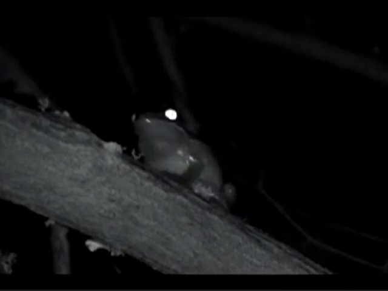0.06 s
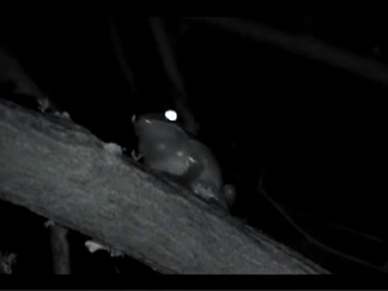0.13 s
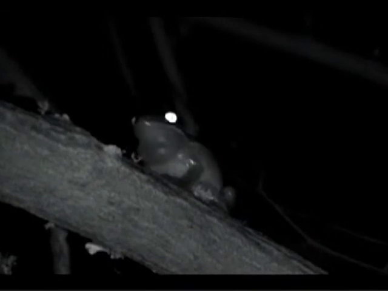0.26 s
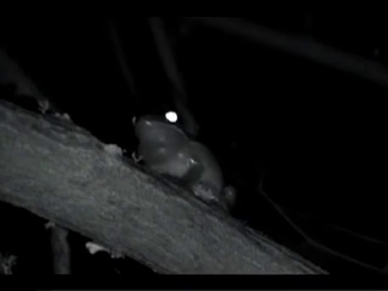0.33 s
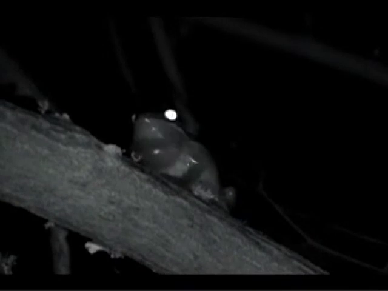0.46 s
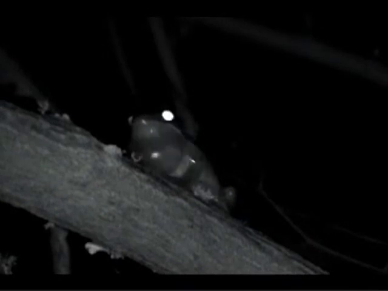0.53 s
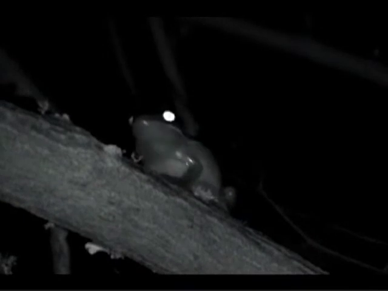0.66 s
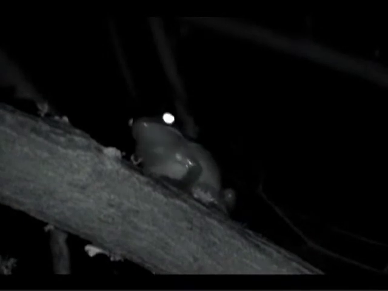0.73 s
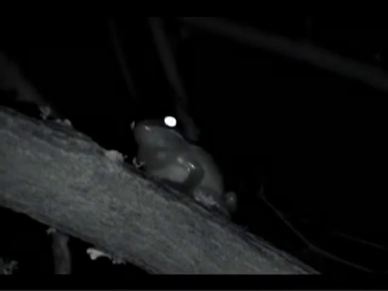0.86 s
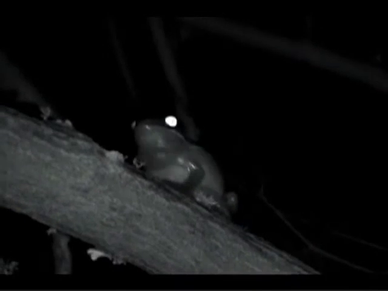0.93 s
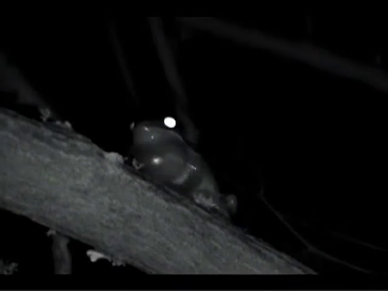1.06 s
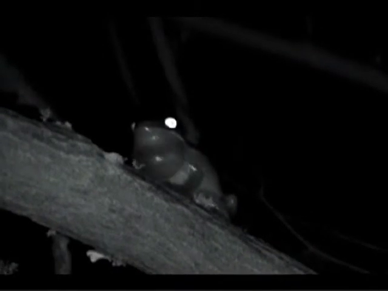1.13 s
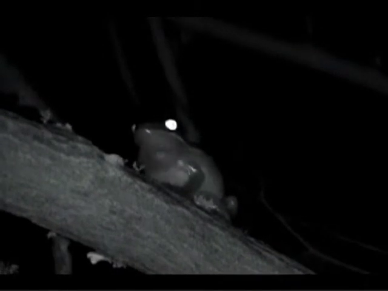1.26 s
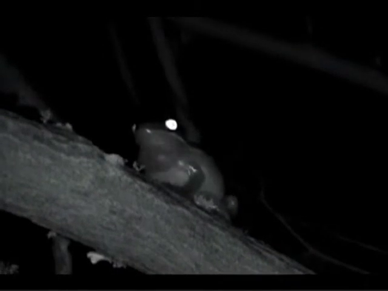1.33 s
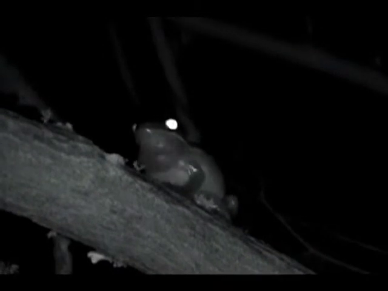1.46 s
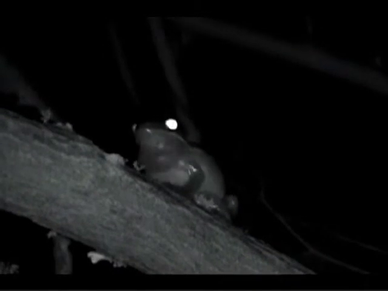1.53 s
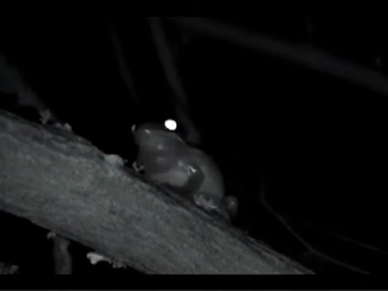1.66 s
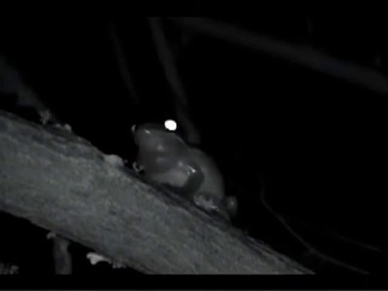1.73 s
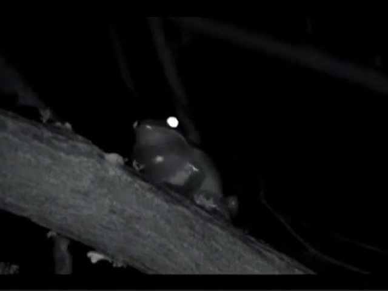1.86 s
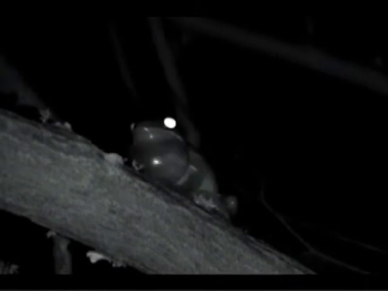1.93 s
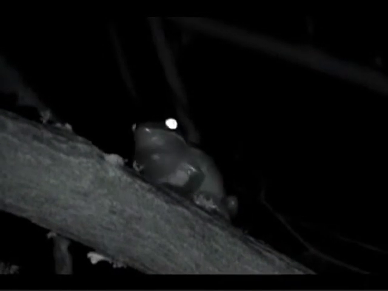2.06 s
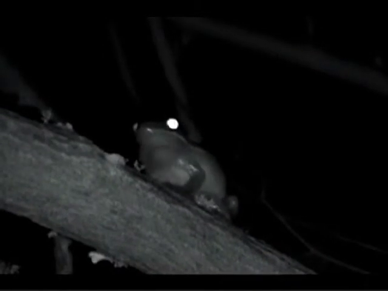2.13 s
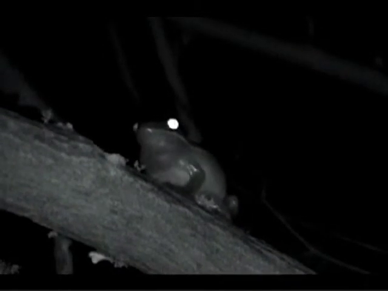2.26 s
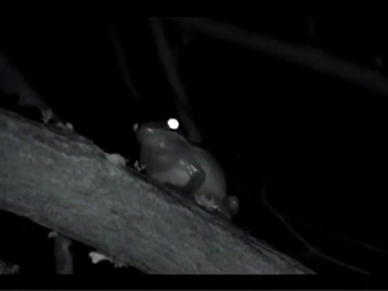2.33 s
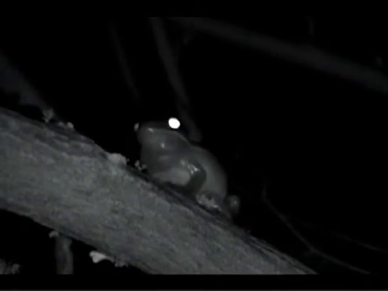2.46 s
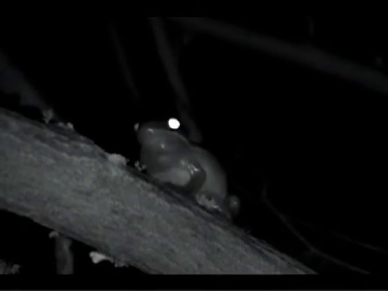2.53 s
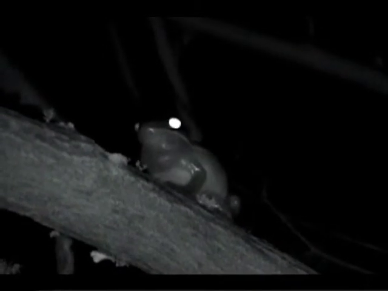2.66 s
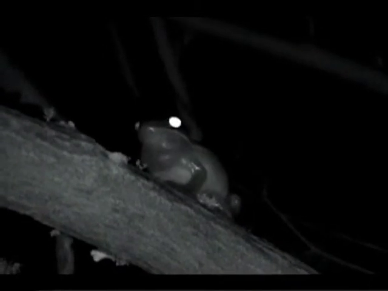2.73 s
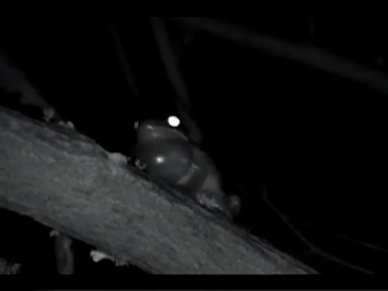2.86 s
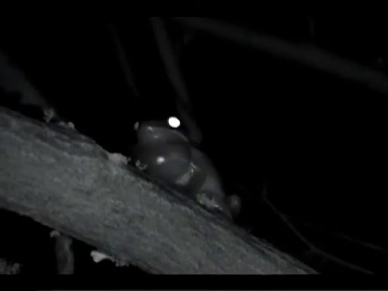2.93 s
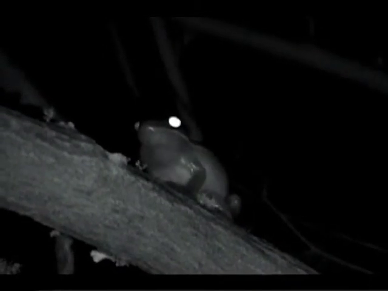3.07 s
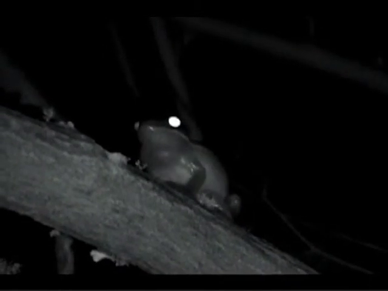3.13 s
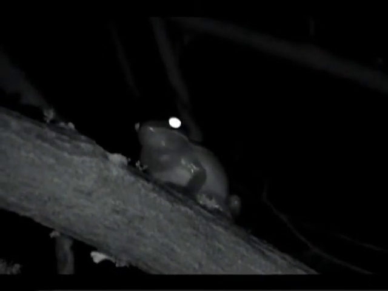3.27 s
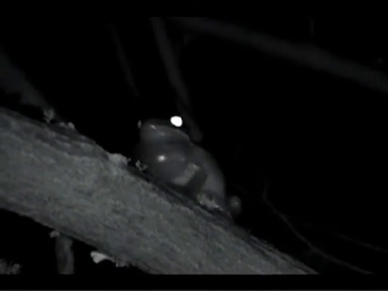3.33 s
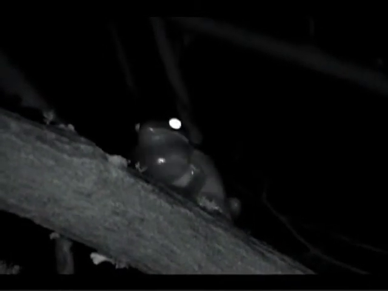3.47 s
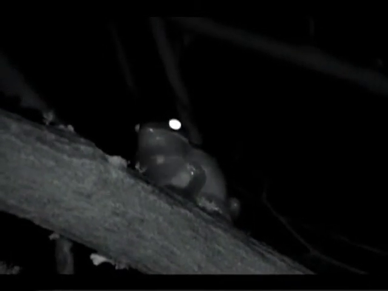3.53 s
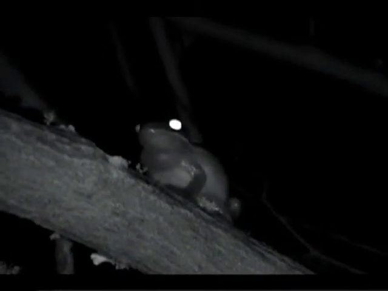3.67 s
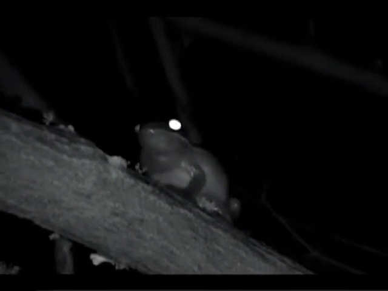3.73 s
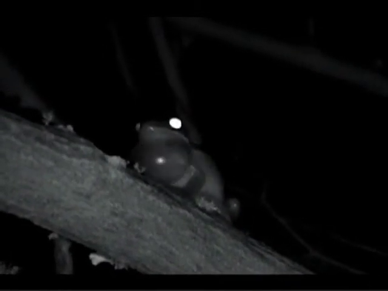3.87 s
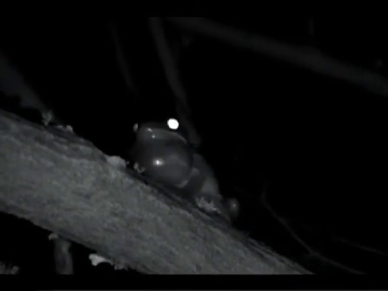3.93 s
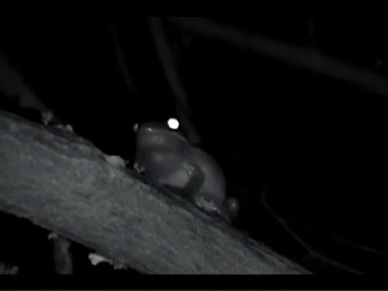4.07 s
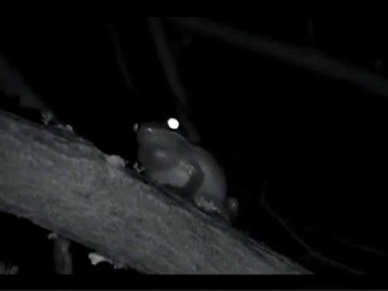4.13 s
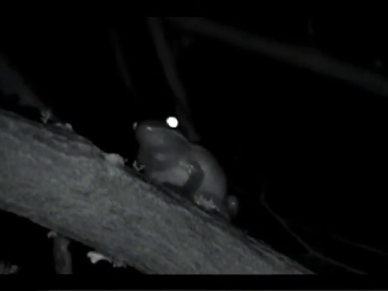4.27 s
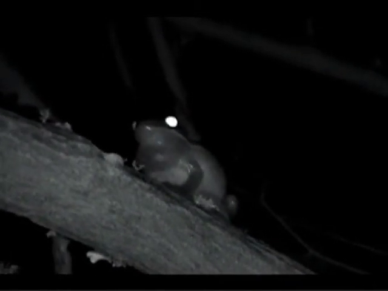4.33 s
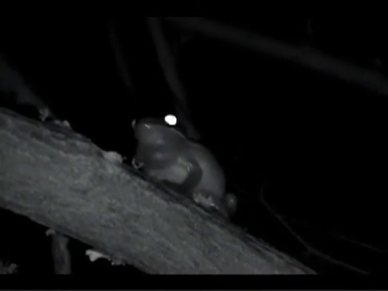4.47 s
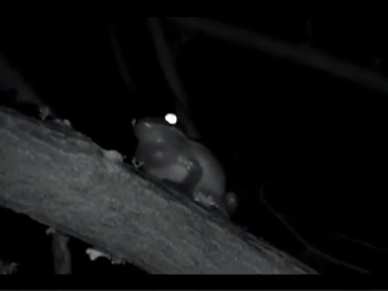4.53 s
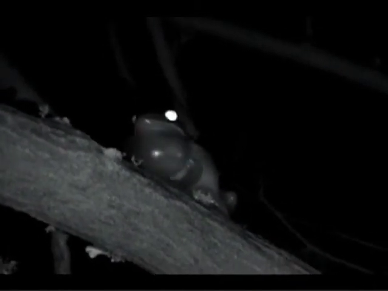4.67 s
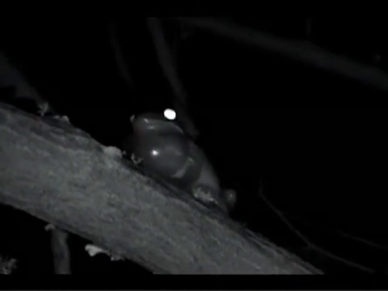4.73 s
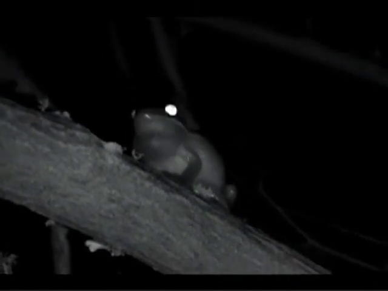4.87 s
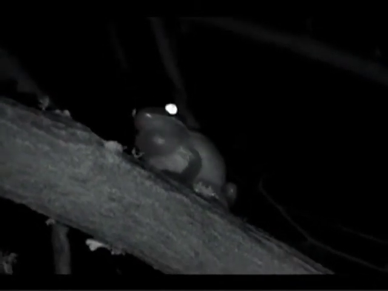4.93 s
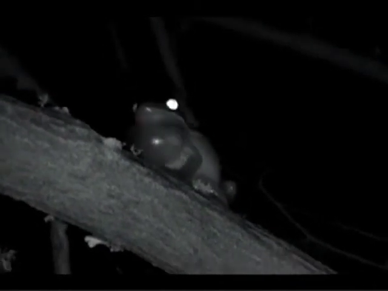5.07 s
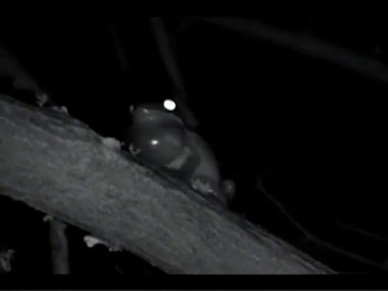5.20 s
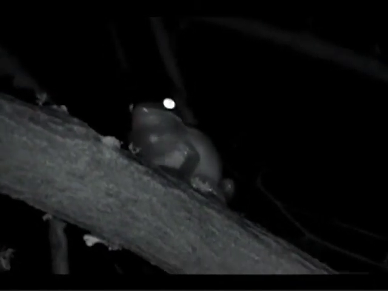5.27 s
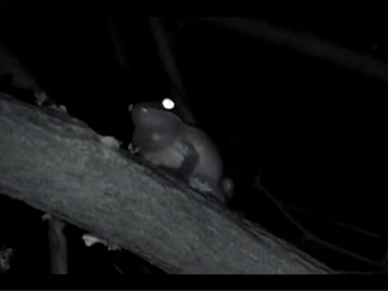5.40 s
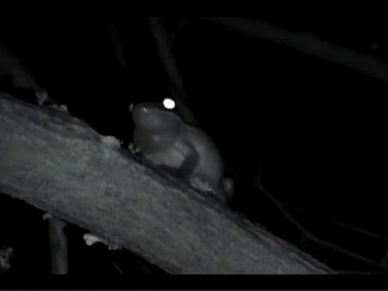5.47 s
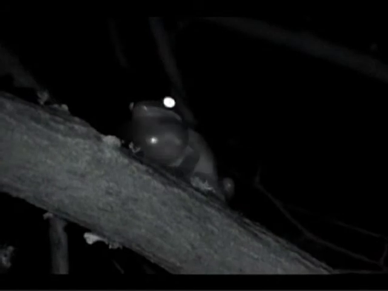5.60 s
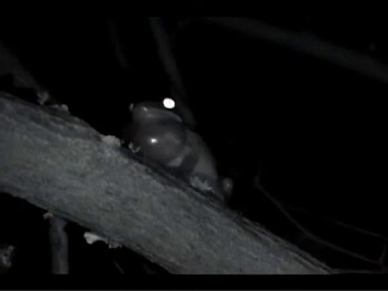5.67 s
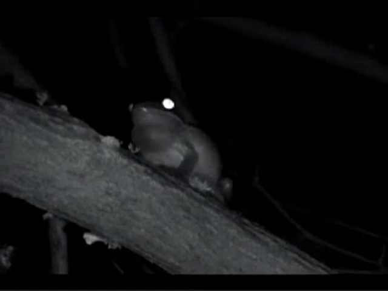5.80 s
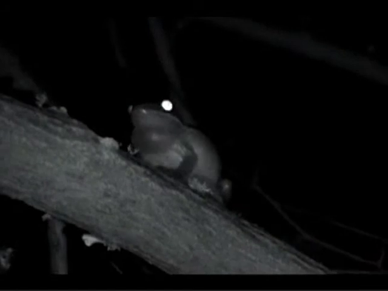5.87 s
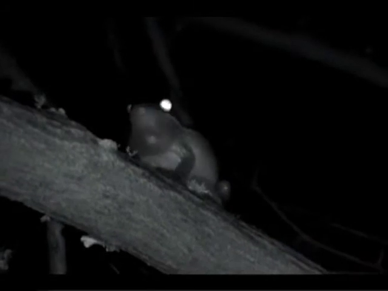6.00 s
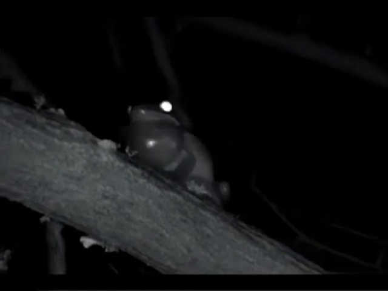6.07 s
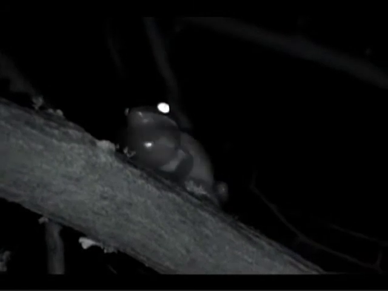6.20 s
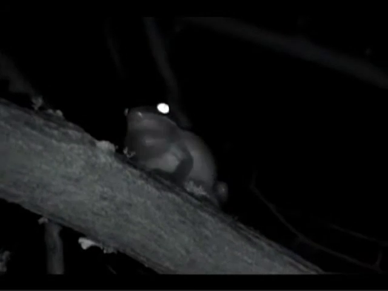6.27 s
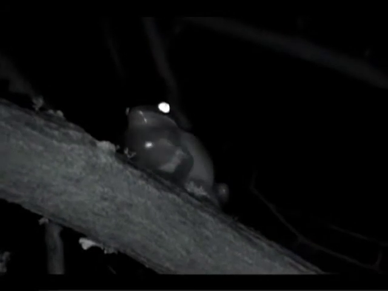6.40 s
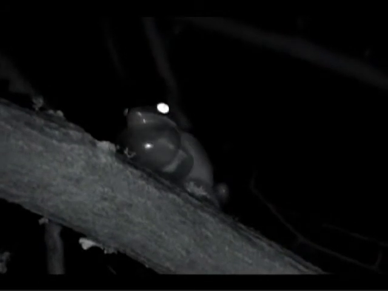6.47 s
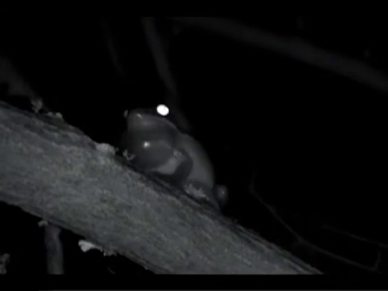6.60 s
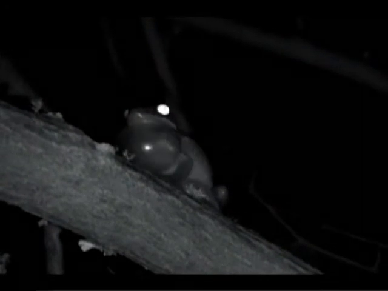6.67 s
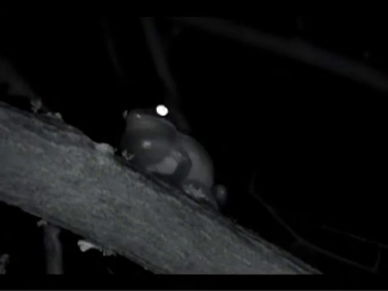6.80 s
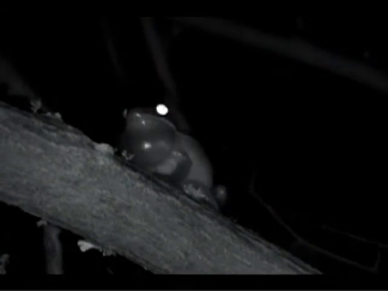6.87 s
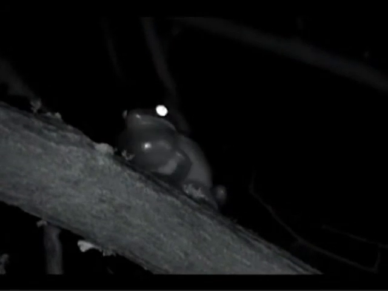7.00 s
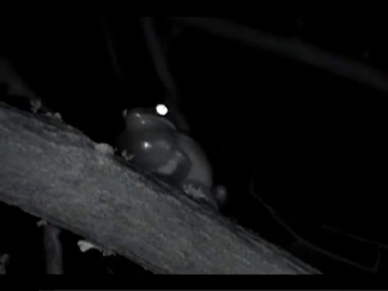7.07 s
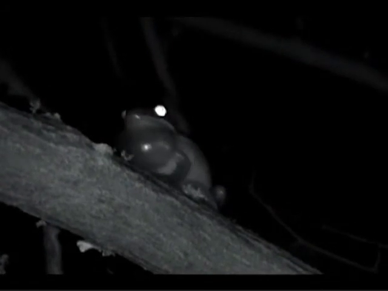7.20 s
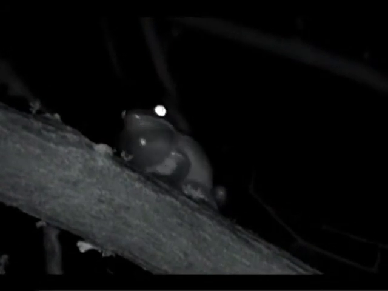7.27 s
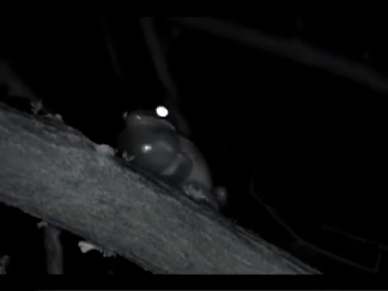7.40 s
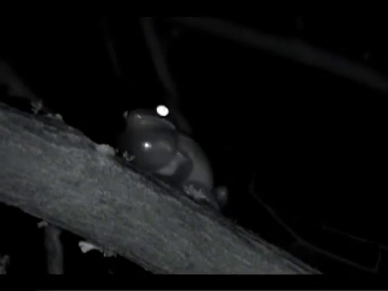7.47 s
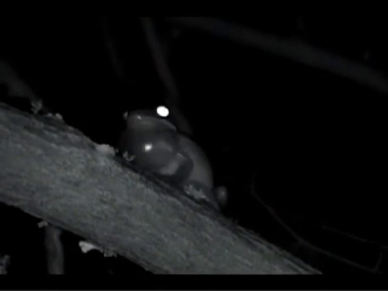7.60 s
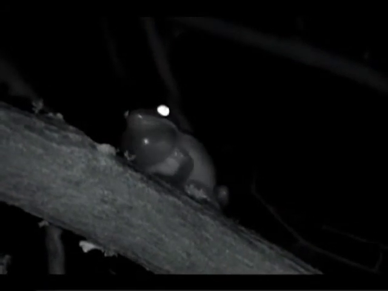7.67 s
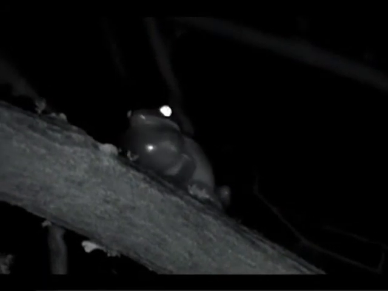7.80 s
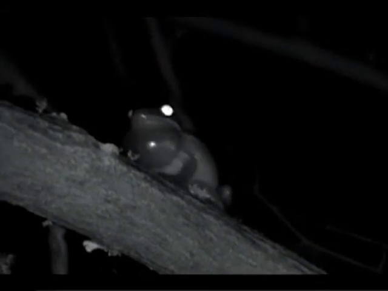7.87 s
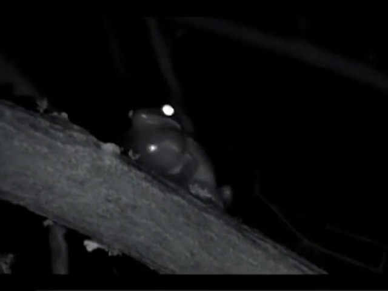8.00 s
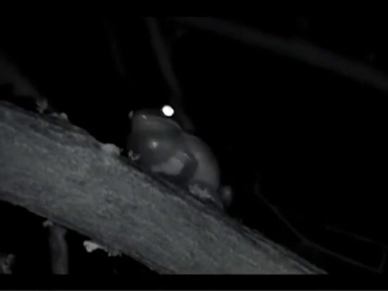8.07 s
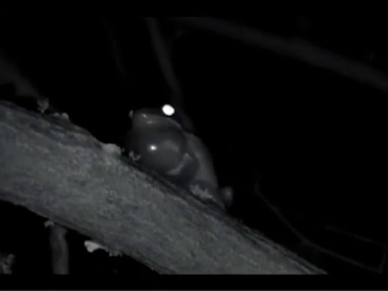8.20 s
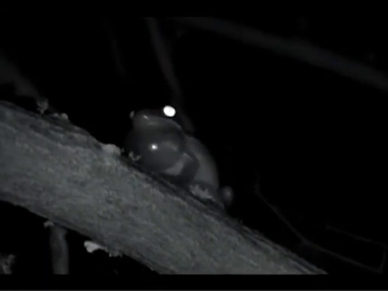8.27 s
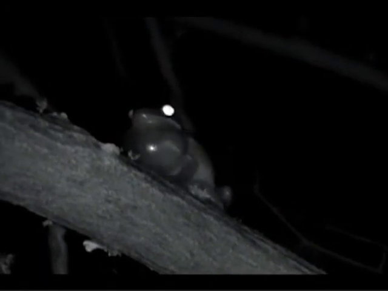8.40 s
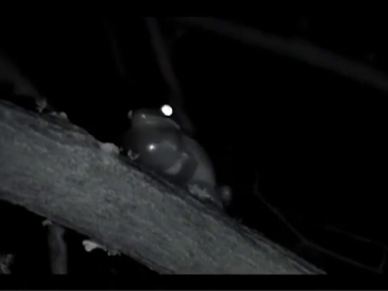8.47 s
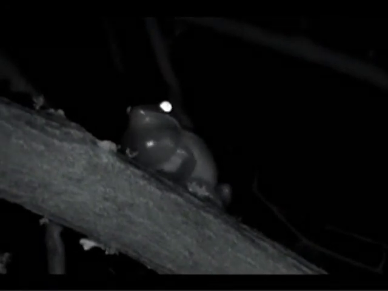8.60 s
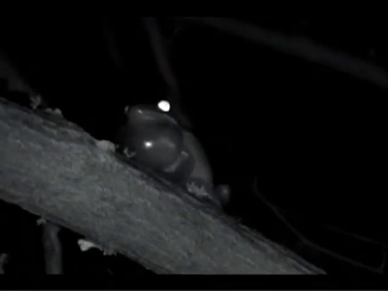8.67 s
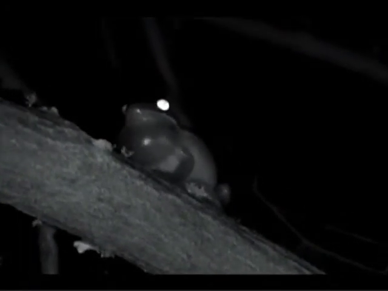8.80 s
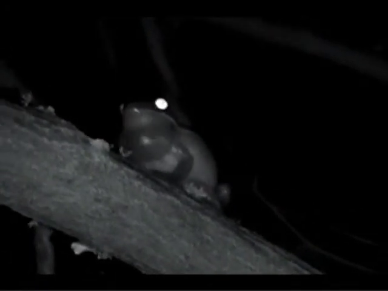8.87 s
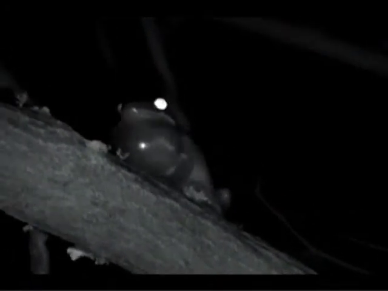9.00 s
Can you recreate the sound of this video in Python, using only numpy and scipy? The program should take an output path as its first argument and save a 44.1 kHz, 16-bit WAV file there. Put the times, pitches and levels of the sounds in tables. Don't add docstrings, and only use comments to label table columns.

```python
import sys
import numpy as np
from scipy import signal
from scipy.fft import rfft, irfft
from scipy.io import wavfile
from scipy.ndimage import uniform_filter1d

SR = 44100
rng = np.random.default_rng(int(sys.argv[2]) if len(sys.argv) > 2 else 0)


def transcribe(signal):
    frames = np.atleast_2d(signal).T
    limited = np.clip(frames, -1, 1)
    pcm = np.round(limited * 32767).astype(np.int16)
    wavfile.write(sys.argv[1], SR, pcm)


def ratio_of_db(decibels):
    return 10 ** (np.asarray(decibels, float) / 20)


N = 398223

# time in seconds, effort in dB, fold beats in Hz,
# lock to every third beat from 0 to 1. The last row is where the croak dies.
CROAKS = [
    [(0.41, -24, 800, .76), (0.4225, -17, 860, .03), (0.434, -17, 868, .03), (0.443, -19, 792, .03),
     (0.4576, -20, 948, .71), (0.47, -21, 908, .84), (0.4765, -21, 928, .03), (0.484, -36, 860, 0)],
    [(0.941, -13, 865, .03), (0.953, -11, 945, .03), (0.958, -8, 1070, .25), (0.9647, -10, 1070, .15),
     (0.972, -14, 935, .03), (0.9855, -10, 885, .03), (0.995, -16, 775, .55), (1.0103, -19, 924, .03),
     (1.026, -36, 860, 0)],
    [(1.826, -10, 980, .35), (1.834, -10, 925, .03), (1.844, -11, 990, .6), (1.857, -11, 1020, .55),
     (1.869, -11.5, 1045, .4), (1.879, -13, 1075, .03), (1.89, -13.5, 1015, .03), (1.9, -14, 975, .03),
     (1.913, -30, 920, 0)],
]
SETTLING_CROAK = [
    (2.757, -19, 1004, .36),
    (2.7633, -14, 1084, .49),
    (2.7686, -9, 932, .27),
    (2.7747, -10, 960, .5),
    (2.79, -12, 1015, 1),
    (2.815, -12, 1012, .75),
    (2.826, -13.5, 1066, .4),
    (2.838, -15, 890, .2),
    (2.859, -36, 960, 0),
]
# start in seconds, hold in seconds,
# lock breaks in seconds, dies in seconds, faint lead-in in dB.
HONKS = [
    (3.2751, 3.2825, 3.3291, 3.374, -15),
    (3.7902, 3.8052, 3.8581, 3.905, -30),
    (4.566, 4.5859, 4.6478, 4.673, -30),
    (5.0025, 5.023, 5.0786, 5.107, -20),
    (5.4865, 5.5066, 5.5697, 5.594, -20),
    (5.9846, 6.0099, 6.0736, 6.098, -20),
]
# share of the tail from 0 to 1, start level in dB,
# peak level in dB, fold beats in Hz, lock from 0 to 1.
HONK_TAIL = [
    (0, -16.5, -14, 1005, .6),
    (.18, -18, -14, 1050, .35),
    (.36, -18, -14, 1075, .03),
    (.56, -18, -18.5, 960, .03),
]
# first burst in seconds, its peak in dB,
# second burst in seconds, time between later throbs in seconds, dies in seconds.
SQUEEZED_NOTES = [
    (6.5866, -11, 6.6018, .0205, 6.68),
    (7.0372, -11, 7.0529, .021, 7.125),
    (7.2585, -23, 7.2735, .020, 7.35),
    (7.443, -17, 7.4596, .0195, 7.527),
    (7.661, -14, 7.675, .019, 7.752),
    (7.8625, -12, 7.8793, .0215, 7.948),
    (8.316, -12.5, 8.3335, .0195, 8.398),
]
FLAT_NOTES = [
    (6.3336, -17.5, 6.3456, .0165, 6.417),
    (6.8264, -16, 6.8419, .020, 6.914),
    (8.0998, -13, 8.114, .020, 8.18),
    (8.559, -13, 8.5732, .020, 8.643),
    (8.8709, -22, 8.8823, .0195, 8.975),
]
# frequency in Hz, level in dB.
FILLING_SAC = [(650, -19), (950, -1.5), (1850, 2), (2700, -11.5), (3700, -17), (4600, -10), (5600, -31.5)]
# frequency in Hz, level in dB.
SLACK_SAC = [(650, -11.5), (900, -11), (1800, -9.5), (2700, 0), (3200, -5.5), (3800, -22), (4700, -28),
             (5800, -23)]
# frequency in Hz, level in dB.
TAUT_SAC = [(670, -34), (1030, -2), (1340, -11.5), (2010, -9), (2350, -11), (2680, 0), (3020, -7),
            (3700, -11), (4020, -23), (4700, -16), (5360, -31), (5700, -20), (6040, -34), (6370, -20)]
# time in seconds, peak in dB, time to fall 60 dB in seconds.
LAPS = [(0.004, -10.5, 0.66), (0.143, -25.5, 2.7), (0.274, -20, 0.94), (0.346, -14.5, 1.08),
        (1.048, -10.5, 0.75), (1.193, -13, 0.56), (1.254, -24.5, 1.7), (1.522, -17.5, 2.1),
        (1.547, -22.5, 4.5), (2.138, -17, 0.71), (2.293, -14.5, 0.86), (2.433, -16.5, 2.97),
        (2.894, -10, 0.76), (3.175, -18, 3.6), (3.495, -20, 0.5), (4.12, -15.5, 1.3),
        (4.192, -15.5, 2.2), (4.371, -16, 1.27), (4.476, -15, 1), (4.889, -27, 0.64), (5.188, -14, 1.5),
        (5.315, -34, 1.21), (5.85, -19, 1.54), (5.953, -15.5, 1.2), (6.748, -24, 1.71),
        (7.148, -31, 1.45), (7.62, -21, 1.7), (8.753, -24.5, 1.5)]
# frequency in Hz, level in dB per Hz.
SLAP = [(250, -11.5), (500, -2), (900, 0), (1600, -5.5), (2600, -10.5)]
# frequency in Hz, level in dB per Hz.
SPLASH = [(450, -9.5), (1200, -0.5), (3000, 1), (6000, -17.5), (9000, -25.5), (14000, -47.5)]
# time in seconds, traffic in dB, high crickets in dB, low crickets in dB, steady
# lapping of the water in dB.
NIGHT = [
    (0.0, -40, -44.5, -42, -45.5),
    (4.0, -41.5, -43.5, -39, -43),
    (9.03, -51, -54, -51, -47),
]
# frequency in Hz, level in dB per Hz.
TRAFFIC = [(25, -14.5), (55, -5), (85, -5), (150, 1), (200, 1), (300, -9.5), (360, -1), (480, -34),
           (900, -6.5)]

CROAK_RISE_MS, CROAK_DIP_DB, CROAK_FROM_DB = 6.0, 4.0, -27
STUTTER_S, STUTTER_RISE_MS, STUTTER_DB = .007, 3.5, -8.8
STUTTER_FROM_DB, STUTTER_DIP_DB, STUTTER_HZ, STUTTER_LOCK = -30, -22, 1065, .5
HOLD_HZ, HOLD_SAG_HZ_PER_S = 1012.5, 3.4
HOLD_DB, HOLD_FROM_DB, HOLD_LOSS_DB_PER_S, TIRING_DB_PER_S = -12.7, -19, 45, .45
FIRST_RISE_MS, FIRST_FROM_DB, FIRST_HZ, FIRST_LOCK, FIRST_FALL_S, GAP_DB = 4.2, -48, 1040, .45, .006, 14
BURST_RISE_MS, THROB_RISE_MS, THROB_DB, THROB_LOSS_DB, THROB_HZ, BURST_LOCK = 4.8, 9.5, -10.8, 1.6, 1003, .8
VALLEY_DB, VALLEY_FILLS_DB, SLOWING = -50, 11, 1.1
SAG_BEFORE_S, SAG_DB = .005, 6
# seconds before it dies, rise in ms, start in dB, peak in dB,
# fold beats in Hz, lock from 0 to 1.
SQUEEZE = (.018, 3.0, -22, -16.5, 1075, .1)
RUN_OUT = (.012, 3.0, -21, -20, 1010, .75)
CLOSING_SAG = .86
NOTE_GAP_S = .06


def frog(breath):
    free, locked = folds(jitter_ms=.07, shimmer_db=2.5, slip=.42)
    s = notes()[0]
    starts = s[np.append(True, np.diff(s) > NOTE_GAP_S)]
    t = np.arange(N) / SR
    age = t - starts[np.maximum(np.searchsorted(starts - .01, t) - 1, 0)]
    filled = np.clip((age - .022) / 0.032, 0, 1)
    hiss = ratio_of_db(-27) * rng.standard_normal(N)
    voice = coloured(free * (1 - filled), FILLING_SAC)
    voice += coloured(free * filled, SLACK_SAC)
    voice += coloured(locked + hiss, TAUT_SAC)
    voice = spread(voice, [(1500, 1500), (2500, 150), (3200, 1800), (5200, 2700)])
    voice = signal.sosfilt(signal.butter(8, 6700, fs=SR, output="sos"), voice)
    top = signal.sosfiltfilt(signal.butter(3, 3900, "high", fs=SR, output="sos"), voice)
    voice = voice + (ratio_of_db(2.5 - 110 * np.clip(age, 0, .12)) - 1) * top
    power = uniform_filter1d(uniform_filter1d(voice ** 2, size=131), size=131)
    return -ratio_of_db(0.35) * breath * voice / np.sqrt(power)


def breath_of_frog():
    s, rise_ms, start_db, peak_db = notes()[:4]
    peak_s = s + np.maximum(rise_ms, .5) / 1000
    held_share = np.clip(rise_ms / 14 - .15, .1, .6)
    held = ratio_of_db(start_db) + held_share * (ratio_of_db(peak_db) - ratio_of_db(start_db))
    held_s = s + 0.53 * (peak_s - s)
    last = np.append(np.diff(s) > NOTE_GAP_S, True)
    first = np.roll(last, 1)
    times = np.concatenate([s, peak_s, held_s, s[first] - .005, peak_s[last] + 0.0092])
    gains = np.concatenate([ratio_of_db(start_db), ratio_of_db(peak_db), held, np.zeros(2 * last.sum())])
    by_time = np.argsort(times)
    return in_time(times[by_time], gains[by_time])


def folds(jitter_ms, shimmer_db, slip):
    s, rise_ms, start_db, peak_db, hz, lock = notes()
    middle = s + np.minimum(np.append(np.diff(s), .01), .035) / 2
    turns = np.cumsum(in_time(middle, hz)) / SR
    at = np.interp(np.arange(1, int(turns[-1]) - 1), turns, np.arange(N))
    throb = np.clip(np.searchsorted(s, at / SR) - 1, 0, None)
    locked = np.clip(np.interp(at / SR, middle, lock), 0, 1)
    unsettled = np.clip((peak_db - start_db)[throb] / 8 - .5, .015, 1)
    unsettled = np.maximum(unsettled, 3 * locked * (1 - locked))
    chance = rng.standard_normal((len(at), 3))
    count = np.cumsum(1 + np.round(slip * unsettled * np.abs(chance[:, 2])))
    is_third = count // 3 > np.roll(count, 1) // 3
    third = is_third * ratio_of_db(shimmer_db * unsettled * chance[:, 1])
    free = clicks(at, (1 - locked) * ratio_of_db(2.5 * chance[:, 1]))
    jittered = at + jitter_ms * unsettled * chance[:, 0] * SR / 1000
    return free, clicks(jittered, 3 * locked * third)


def notes():
    rows = [croak(curve) for curve in CROAKS + [SETTLING_CROAK]]
    rows += [honk(*row) for row in HONKS]
    rows += [chatter(*row, SQUEEZE) for row in SQUEEZED_NOTES]
    rows += [chatter(*row, RUN_OUT) for row in FLAT_NOTES]
    rows = np.vstack(rows)
    return np.transpose(rows[np.argsort(rows[:, 0])])


def croak(curve):
    rows, before = [], 0
    for s, db, hz, lock in curve[:-1]:
        rise_ms = min(CROAK_RISE_MS, 700 * (s - before))
        from_db = db - CROAK_DIP_DB if before else CROAK_FROM_DB
        rows.append((s - rise_ms / 1000, rise_ms, from_db, db, hz, lock))
        before = s
    s, db, hz, lock = curve[-1]
    return rows + [(s, 1, db + 2, db - 2, hz, lock)]


def honk(start, hold, breaks, dies, lead_db):
    since_first = start - HONKS[0][0]
    tired_db = TIRING_DB_PER_S * since_first
    hz = HOLD_HZ - HOLD_SAG_HZ_PER_S * since_first
    rows = [(start - STUTTER_S, STUTTER_RISE_MS, -33, lead_db, STUTTER_HZ, .3)]
    stutters = round((hold - start) / STUTTER_S)
    for k, s in enumerate(np.linspace(start, hold, stutters, endpoint=False)):
        from_db = STUTTER_DIP_DB if k else STUTTER_FROM_DB
        rows.append((s, STUTTER_RISE_MS, from_db, STUTTER_DB - tired_db, STUTTER_HZ, STUTTER_LOCK))
    for k, s in enumerate(np.linspace(hold, breaks, num=3, endpoint=False)):
        db = HOLD_DB - tired_db - HOLD_LOSS_DB_PER_S * (s - hold)
        rows.append((s, STUTTER_RISE_MS, db if k else HOLD_FROM_DB - tired_db, db, hz, 1))
    for share, from_db, db, tail_hz, lock in HONK_TAIL:
        s = breaks + share * (dies - breaks)
        rows.append((s, STUTTER_RISE_MS, from_db - 2 * tired_db, db - 2 * tired_db, tail_hz, lock))
    return rows + [fading(dies, HONK_TAIL[-1][3])]


def chatter(first, first_db, second, between, dies, ending):
    before_s, end_rise_ms, end_from_db, end_db, end_hz, end_lock = ending
    last = dies - before_s
    gap_db, sag_db = first_db - GAP_DB, end_db - SAG_DB
    rows = [(first, FIRST_RISE_MS, FIRST_FROM_DB, first_db, FIRST_HZ, FIRST_LOCK),
            (first + FIRST_FALL_S, 1, gap_db, gap_db, FIRST_HZ, FIRST_LOCK),
            (second, BURST_RISE_MS, VALLEY_DB, THROB_DB, THROB_HZ, BURST_LOCK),
            (last, end_rise_ms, end_from_db, end_db, end_hz, end_lock),
            (dies - SAG_BEFORE_S, 1, sag_db, sag_db, CLOSING_SAG * end_hz, end_lock)]
    later = second + np.cumsum(between * SLOWING ** np.arange(3))
    for k, s in enumerate(later, start=1):
        db = THROB_DB - THROB_LOSS_DB * k
        valley_db = min(VALLEY_DB + VALLEY_FILLS_DB * k, db - 6)
        if s < last - .006:
            rows.append((s, THROB_RISE_MS, valley_db, db, THROB_HZ, 1))
    rows = [(s - rise_ms / 1000, rise_ms, *rest) for s, rise_ms, *rest in rows]
    return rows + [fading(dies, CLOSING_SAG * end_hz)]


def fading(s, hz):
    return s, 1, -30, -33, CLOSING_SAG * hz, 0


def clicks(at, strength):
    taps = np.floor(at)[:, None] + np.arange(-7, 9)
    away = taps - at[:, None]
    shape = np.sinc(away) * np.cos(np.pi * away / 16) ** 2
    places = np.clip(taps, 0, N - 1).astype(int)
    return np.bincount(places.ravel(), (strength[:, None] * shape).ravel(), N)


def spread(x, stages):
    for hz, width_hz in stages:
        r = np.exp(-np.pi * width_hz / SR)
        poles = [1, -2 * r * np.cos(2 * np.pi * hz / SR), r * r]
        x = signal.lfilter(poles[::-1], poles, x)
    return x


def undergrowth(x, t60, cut_hz):
    t = np.arange(int(.5 * SR)) / SR
    echoes = rng.standard_normal(len(t)) * ratio_of_db(-60 * t / t60) * (t > .012)
    echoes = signal.sosfilt(signal.butter(1, cut_hz, fs=SR, output="sos"), echoes)
    return signal.fftconvolve(x, echoes / np.sqrt(np.sum(echoes ** 2)))[:N]


def lapping(water_db):
    t = np.arange(N) / SR
    dull, bright = ratio_of_db(2 * water_db + 2), ratio_of_db(2 * water_db)
    for s, peak_db, t60 in LAPS:
        since = np.maximum(t - s, 0)
        dull += (1 - np.exp(-since / .002)) ** 2 * ratio_of_db(2 * (peak_db - 13 - 60 * since / (0.29 * t60)))
        bright += (1 - np.exp(-since / 0.036)) ** 2 * ratio_of_db(2 * (peak_db - 10 - 60 * since / t60))
    slapped = np.sqrt(dull) * crackle(SLAP, per_s=3000, size_db=3.5, clump_db=3.0)
    splashing = np.sqrt(bright) * crackle(SPLASH, per_s=6000, size_db=1.0, clump_db=2.0)
    return slapped + splashing


def crackle(spectrum, per_s, size_db, clump_db):
    sizes = ratio_of_db(size_db * np.minimum(rng.exponential(1, N), 4)) * rng.choice([-1, 1], N)
    snaps = sizes * (rng.random(N) < per_s / SR) * ratio_of_db(clump_db * drift(19.8))
    return rms_one(coloured(snaps, spectrum))


def crickets(hz, width_hz, throb_db):
    band = signal.butter(2, [hz - width_hz / 2, hz + width_hz / 2], "band", fs=SR, output="sos")
    return rms_one(signal.sosfilt(band, rng.standard_normal(N)) * ratio_of_db(throb_db * drift(33)))


def traffic():
    return rms_one(coloured(rng.standard_normal(N), TRAFFIC))


def coloured(x, spectrum):
    hz, db = np.transpose(spectrum)
    grid = np.maximum(np.fft.rfftfreq(4096, 1 / SR), 1)
    beyond = np.log2(np.maximum(hz[0] / grid, 1) * np.maximum(grid / hz[-1], 1))
    gain_db = np.maximum(np.interp(np.log(grid), np.log(hz), db) - 18 * beyond, -80)
    cepstrum = irfft(np.log(ratio_of_db(gain_db)))
    cepstrum[1:2048] *= 2
    cepstrum[2049:] = 0
    return signal.fftconvolve(x, irfft(np.exp(rfft(cepstrum))))[:N]


def drift(rate):
    r = np.exp(-2 * np.pi * rate / SR)
    return rms_one(signal.lfilter([1], [1, -2 * r, r * r], rng.standard_normal(N + SR))[SR:])


def rms_one(x):
    return x / np.sqrt(np.mean(x ** 2) + 1e-20)


def in_time(s, values):
    return np.interp(np.arange(N) / SR, s, values)


def scene():
    s, traffic_db, high_db, low_db, water_db = np.transpose(NIGHT)
    breath = breath_of_frog()
    call = frog(breath)
    echoes = ratio_of_db(-22) * undergrowth(np.diff(call, prepend=0) * 3.2, t60=.4, cut_hz=3500)
    night = lapping(in_time(s, water_db))
    night += ratio_of_db(in_time(s, high_db)) * crickets(6930, 435, throb_db=1.0)
    night += ratio_of_db(in_time(s, low_db) + 1.5) * crickets(3038, 236, throb_db=-1.5)
    night += ratio_of_db(in_time(s, traffic_db)) * traffic()
    hiss_db = -59.5 + .3 * (in_time(s, high_db) + 44)
    night += ratio_of_db(hiss_db) * rng.standard_normal(N)
    release = np.exp(-1 / (.08 * SR))
    duck_db = -45 * signal.lfilter([1 - release], [1, -release], breath)
    return (call + echoes + ratio_of_db(duck_db) * night)[None]


def band_limit(x):
    return signal.sosfilt(signal.butter(12, 14460, fs=SR, output="sos"), x)


def record(dry):
    limited = .76 * np.tanh(dry / .76)
    top_cut = signal.cheby2(10, 50, 15100, fs=SR, output="sos")
    return band_limit(signal.sosfilt(top_cut, limited))


dry = scene()
out = record(dry)
transcribe(out)
```